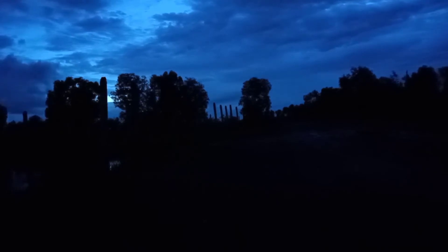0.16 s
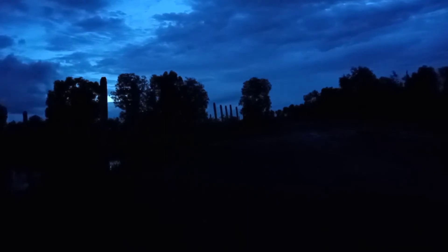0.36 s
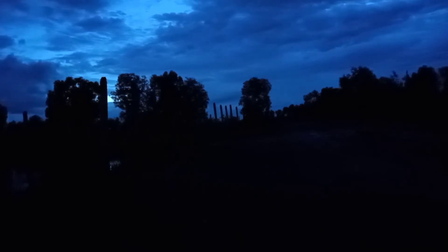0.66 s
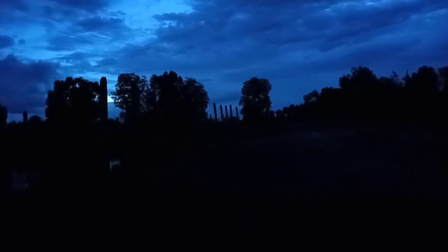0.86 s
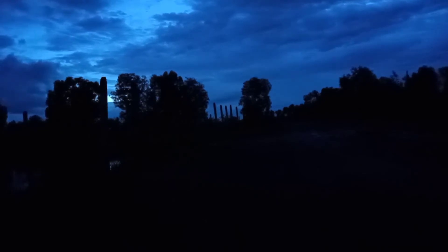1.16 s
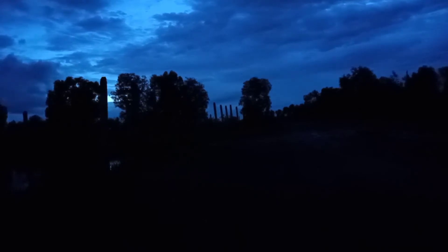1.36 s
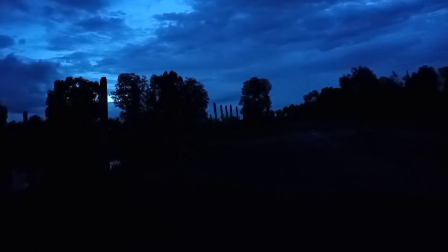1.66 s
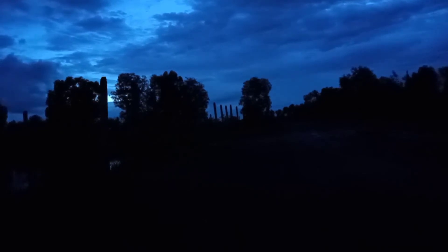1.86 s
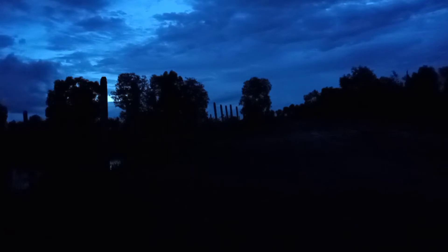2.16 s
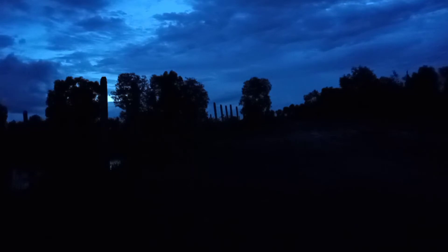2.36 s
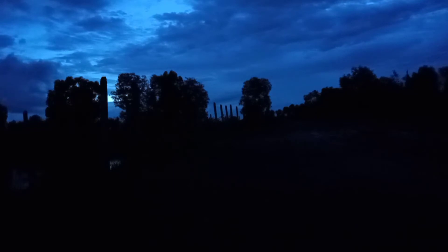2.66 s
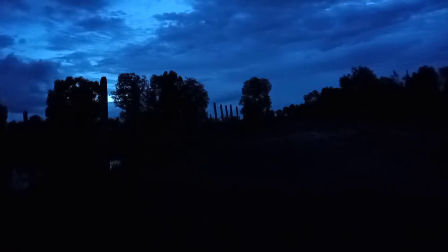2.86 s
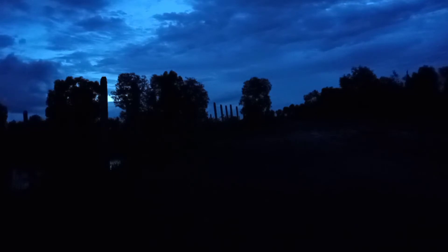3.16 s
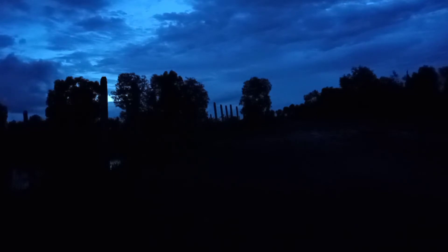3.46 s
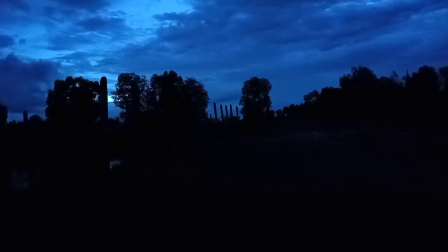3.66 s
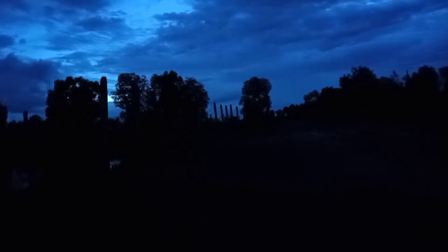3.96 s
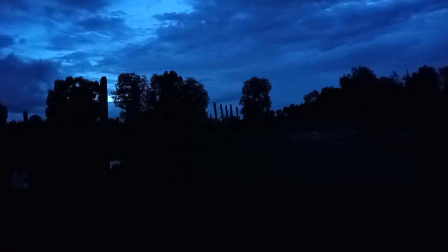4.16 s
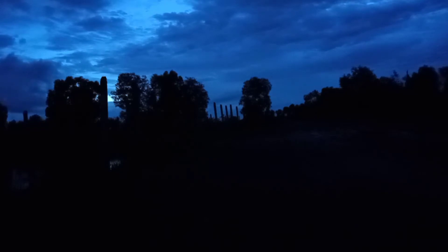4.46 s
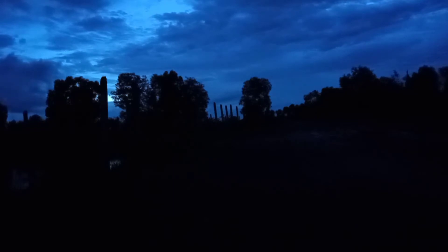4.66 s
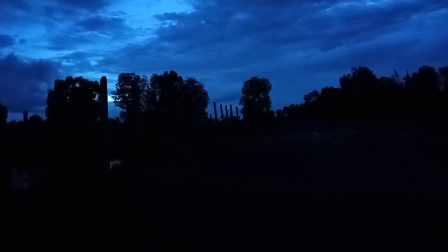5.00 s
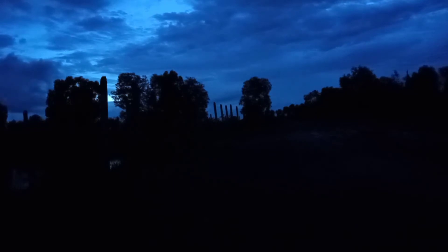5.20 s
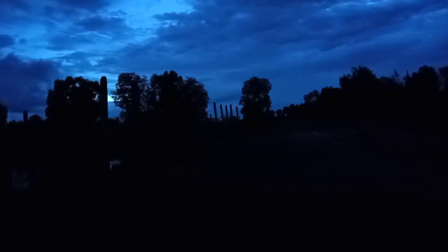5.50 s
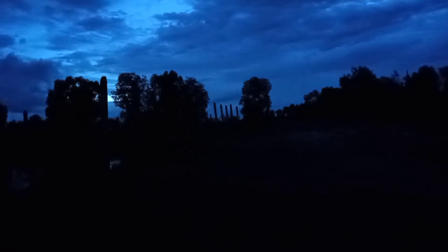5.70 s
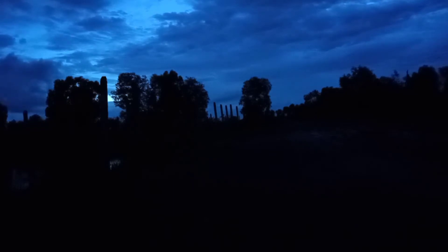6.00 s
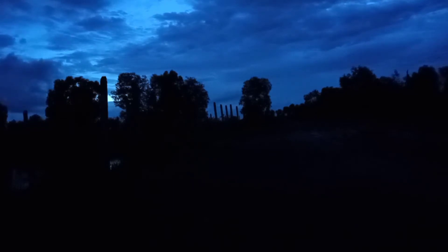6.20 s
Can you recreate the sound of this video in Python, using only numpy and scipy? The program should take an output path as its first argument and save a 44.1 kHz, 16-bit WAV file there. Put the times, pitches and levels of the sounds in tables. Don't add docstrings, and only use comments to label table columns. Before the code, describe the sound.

Open flooded fields at dusk, heard from one still microphone. A close tree frog gives hard, bright, buzzy calls, each about 0.06 s of rapid pulses, at 0.2, 0.5, 0.8 and 1.1 s. A lower far frog answers between them until about 2.1 s. A toad holds a soft swelling hoot at 0.7 s, then gives short falling hoots every half second or so, fainter later. From 1.3 s a second frog croaks hoarsely, then calls clearly until 2.9 s. From 3 to 4.9 s a rough, stumbling frog takes over. A choked near burst at 4.47 s leads to the close frog's loud return from 4.8 s, calling every 0.3 s to the end at 6.3 s, overlapped by others. Underneath: blurred distant chorus, peeps, thin high cricket trill pausing around 3.4-5.3 s, faint insect hiss, slight rustles, low traffic hum, short echoes.

```python
import sys
import numpy as np
from scipy import signal
from scipy.fft import rfft, irfft, next_fast_len
from scipy.io import wavfile
from scipy.ndimage import uniform_filter1d, map_coordinates

SR = 44100
rng = np.random.default_rng(int(sys.argv[2]) if len(sys.argv) > 2 else 0)


def unload_audio(sound):
    columns = np.transpose(np.atleast_2d(sound))
    steps = np.round(np.clip(columns, -1, 1) * 32767)
    wavfile.write(sys.argv[1], SR, steps.astype(np.int16))


def magnitude_from_level(level_db):
    exponent = np.asarray(level_db, float) / 20
    return 10 ** exponent


N = 279594
TIME = np.arange(N) / SR

CLEAR, HOARSE, SHAKY = 0.006, 0.045, 0.12


def unit(x):
    return x / np.sqrt(np.mean(x ** 2) + 1e-20)


def along(points, hz):
    f, v = np.transpose(points)
    return np.interp(np.log(hz + 1), np.log(f + 1), v)


def curves(rows):
    s, *cols = np.transpose(rows)
    return [np.interp(TIME, s, c) for c in cols]


def wobble(rate):
    return map_coordinates(rng.standard_normal(int(N * rate / SR) + 4), [TIME * rate])


def noise(spectrum):
    size = next_fast_len(N)
    colour = magnitude_from_level(along(spectrum, np.fft.rfftfreq(size, 1 / SR)))
    return unit(irfft(rfft(rng.standard_normal(size)) * colour, size)[:N])


def ringing(spectrum, size=4096):
    cepstrum = irfft(np.log(magnitude_from_level(along(spectrum, np.fft.rfftfreq(size, 1 / SR))) + 1e-6))
    cepstrum[1:size // 2] *= 2
    cepstrum[size // 2 + 1:] = 0
    h = irfft(np.exp(rfft(cepstrum)))[:size // 2]
    return h / np.linalg.norm(h)


def glide(s, hz, db, edge, drop):
    out = np.zeros(N)
    start = int(s[0] * SR)
    t = TIME[start:int(s[-1] * SR)]
    settle = 1 + drop * np.exp(-np.abs(t - s[0]) / 0.006)
    phase = 2 * np.pi * np.cumsum(np.interp(t, s, hz) * settle) / SR
    gate = np.clip(np.minimum(t - s[0], s[-1] - t) / edge, 0, 1)
    level = np.sqrt(2) * magnitude_from_level(np.interp(t, s, db))
    out[start:][:len(t)] = level * np.sin(gate * np.pi / 2) ** 2 * np.sin(phase)
    return out


def echo(x, delay=0.013):
    # (frequency [Hz], time to fall 60 dB [s])
    banks = [(300, 0.38), (2000, 0.17), (3500, 0.21), (8000, 0.12)]
    hz, t, z = signal.stft(rng.standard_normal(SR * 3 // 4), SR, nperseg=256)
    dying = magnitude_from_level(-60 * t / along(banks, hz)[:, None])
    tail = signal.istft(z * dying, SR, nperseg=256)[1]
    delayed = np.pad(x, (int(delay * SR), 0))
    return signal.fftconvolve(delayed, tail / np.linalg.norm(tail))[:N]


def reeds(x, db, t60=0.032, size=4096):
    out = np.pad(x, (0, 2 * size))
    t = np.arange(size // 2) / SR
    for a in range(0, N, size // 2):
        paths = rng.standard_normal(len(t)) * magnitude_from_level(-60 * t / t60)
        piece = x[a:a + size] * np.hanning(size)[:N - a]
        if np.abs(piece).max() > 1e-7:
            scattered = signal.fftconvolve(piece, paths / np.linalg.norm(paths))
            out[a:][:len(scattered)] += magnitude_from_level(db) * scattered
    return out[:N] / np.sqrt(1 + magnitude_from_level(2 * db))


def add_pulses(out, call, jitter, scatter_db):
    steady_s = 0.024
    ragged, ragged_s = 0.2, 0.013
    s, rate, db = np.transpose(call)
    t = np.arange(s[0], s[-1], 1 / SR)
    cycles = np.cumsum(np.interp(t, s, rate)) / SR
    chance = rng.standard_normal((2, 60))[:, :int(cycles[-1]) + 1]
    beat = np.arange(chance.shape[1])
    due = np.interp(beat, cycles, t)
    stumble = ragged * np.clip(1 - (s[-1] - due) / ragged_s, 0, 1)
    scatter = np.interp(due - s[0], [0, steady_s], [np.max(jitter), np.min(jitter)])
    when = np.interp(beat + np.abs((scatter + stumble) * chance[0]), cycles, t)
    size = magnitude_from_level(np.interp(when, s, db) + scatter_db * chance[1]) * np.sqrt(SR / np.interp(when, s, rate))
    at = np.floor(when * SR).astype(int)[:, None] + np.arange(-8, 9)
    off = at - when[:, None] * SR
    np.add.at(out, at, size[:, None] * np.sinc(off) * np.cos(np.pi * off / 18) ** 2)


def voice(calls, sac, jitter, scatter_db, tighten=1):
    pulses, empty = np.zeros(N + SR), np.zeros(N + SR)
    for call in calls:
        add_pulses(pulses, call, jitter, scatter_db)
        a, b = int(call[0][0] * SR) - 9, int(call[-1][0] * SR) + 9
        empty[max(a, 0):b] = np.clip(np.linspace(-0.3, 1.6, b - max(a, 0)), 0, 1)
    if tighten == 1:
        return signal.fftconvolve(pulses, ringing(sac))[:N]
    tight_sac = [(tighten * hz, db) for hz, db in sac]
    full = signal.fftconvolve(pulses * (1 - empty), ringing(sac))
    emptied = signal.fftconvolve(pulses * empty, ringing(tight_sac))
    return (full + emptied)[:N]


def far_frog(rows, sac, jitter, scatter_db, start_db, end_db, rally, settle=0.5):
    calls = [[(s, first, db + start_db),
              (s + settle * long, mid, db),
              (s + 0.89 * long, mid * (1 + 2 * rally) / 3, db),
              (s + long, rally * mid, db + end_db)]
             for s, long, db, first, mid in rows]
    return voice(calls, sac, jitter, scatter_db)


def traffic():
    # (time [s], level [dB])
    swell = [(0, -45.5), (1.8, -45.5), (2.7, -46), (3.7, -45), (4.3, -48), (5.5, -46), (6.34, -46)]
    # (frequency [Hz], level [dB])
    hum = [(13, -32), (22, -36), (72, 2), (103, 4), (136, 1.5), (204, -9), (285, -10.5), (398, -17.5),
           (537, -17.5), (1200, -27), (1560, -74), (2640, -120)]
    level_db = curves(swell)[0] + 1.5 * wobble(3.5) + 1.8 * wobble(12)
    return magnitude_from_level(level_db) * noise(hum)


def crickets():
    # (start [s], end [s], swell [s], level [dB])
    bouts = [
        (0, 0.376, 0.018, -61),
        (.48, 3.37, 0.06, -62),
        (5.351, 6.5, .4, -64),
    ]
    # (time [s], rate [strokes/s])
    strokes = [(0, 43.1), (1.6, 43.4), (2.5, 42.8), (3.3, 42), (5.4, 44.4), (6.34, 44.2)]
    # (frequency [Hz], level [dB])
    wing_colour = [(7900, -40), (8500, -12), (8700, 0), (9050, -1), (9250, -10), (9550, -14), (9900, -40)]
    # (frequency [Hz], level [dB])
    hiss = [(3500, -44.5), (4500, -31.5), (5300, -14.5), (6200, -21.5), (6800, -16.5), (7200, -2),
            (7650, -11.5), (8400, 1), (9400, -18.5), (9900, -21.5), (11000, -17.5), (12500, -32.5),
            (15000, -22), (15600, -37)]
    silent_db, shy_db, stop_s = -79.5, -13.5, 0.03
    close_db = np.max([np.interp(TIME, [a - stop_s, a, a + swell, b - stop_s, b],
                                 [silent_db, db + shy_db, db, db, silent_db])
                       for a, b, swell, db in bouts], axis=0)
    rate = curves(strokes)[0]
    into = (np.cumsum(rate) / SR + 0.3) % 1 / rate
    scrapes = 0
    for delay, db in [(0.0045, 0), (0.0113, -0.5), (0.0145, -12), (0.018, -11)]:
        u = np.clip(into - delay, 0, 1) / 0.0009
        scrapes = scrapes + magnitude_from_level(db) * u * np.exp(1 - u)
    wing = np.sin(2 * np.pi * np.cumsum(8850 + 90 * wobble(500)) / SR)
    close = unit(scrapes * magnitude_from_level(2 * wobble(90)) * wing) + 0.38 * noise(wing_colour)
    return magnitude_from_level(close_db - 2.5) * close + magnitude_from_level(-70 + 1.3 * wobble(5)) * noise(hiss)


def chorus(count=150):
    # (time [s], level [dB])
    swell = [(0, -47.5), (.26, -53), (.75, -54), (.94, -52), (1.3, -53), (2.7, -56.5), (2.9, -49),
             (3.0, -54.5), (4.1, -55.5), (4.31, -49), (4.43, -56.5), (4.56, -47.5), (4.7, -49.5),
             (5.55, -50), (5.7, -44), (5.86, -58), (6.1, -39), (6.34, -55.5)]
    # (frequency [Hz], level [dB])
    sac = [(700, -33), (1100, -28), (1520, -8.5), (2150, -13), (2600, -12.5), (3170, -2), (3450, 0.5),
           (3900, -9.5), (4660, -21.5), (6000, -37), (9000, -63.5)]
    blur = 1.8
    gap = N / SR / count
    rows = []
    for i, (late, loud, quick) in enumerate(rng.random((count, 3))):
        hz = 330 + 110 * quick
        rows.append((0.01 + gap * (i + late), 0.07, 7 * loud, 1.2 * hz, hz))
    direct = far_frog(rows, sac, jitter=HOARSE, scatter_db=2, start_db=-6, end_db=-9, rally=1.2)
    blurred = unit(direct) + blur * np.roll(unit(echo(direct)), SR)
    steady = blurred / np.sqrt(uniform_filter1d(blurred ** 2, SR // 5) + 1e-9)
    return magnitude_from_level(curves(swell)[0]) * steady


def peeps():
    # (time [s], length [s], level [dB], first pitch [Hz], last pitch [Hz])
    rows = [(6.0825, .0145, -40.5, 1390, 1230), (0.015, 0.02, -43.5, 2350, 2000),
            (1.1, 0.021, -49, 2250, 1960), (1.382, 0.02, -37.5, 1560, 2040), (1.2, .015, -43, 3150, 3600),
            (1.394, .008, -50, 3900, 4200), (3.064, 0.0203, -41.5, 1350, 1900),
            (3.1, 0.077, -59, 1750, 1650), (3.632, .05, -60, 1680, 1800), (5.06, .018, -44, 2000, 1900),
            (3.378, 0.01, -36, 910, 740), (4.084, 0.012, -33, 910, 880), (5.057, 0.021, -34.5, 953, 820),
            (0.033, 0.044, -48.5, 288, 331), (0.061, 0.032, -48.5, 560, 470),
            (0.052, 0.045, -48.5, 880, 918), (0.21, 0.06, -52, 290, 314), (0.19, 0.09, -57.5, 594, 610),
            (0.21, 0.06, -58.5, 875, 938), (4.474, 0.012, -28.5, 1890, 2170),
            (4.678, 0.016, -39.5, 2300, 1900), (6.086, 0.031, -40, 900, 830),
            (4.487, 0.024, -47, 1600, 1400), (5.0525, 0.0135, -41.5, 1185, 1075),
            (5.661, 0.38, -63.5, 511, 521)]
    tones = sum(glide([s, s + long], [first, last], [db, db], edge=min(long / 2, 0.004), drop=0)
                for s, long, db, first, last in rows)
    tones = tones * magnitude_from_level(3 * wobble(60))
    return tones + magnitude_from_level(-12.5) * echo(tones)


def fourth_frog():
    # (time [s], length [s], level [dB], first pulse rate [Hz], middle pulse rate [Hz])
    rows = [
        (.046, 0.078, -38, 320, 336),
        (.345, .078, -45, 306.6, 337.2),
        (.632, 0.054, -44.5, 329, 339.4),
        (.925, 0.055, -41, 350.5, 334.7),
        (1.21, .07, -43.5, 349, 332.8),
        (1.492, 0.063, -44.5, 341, 323.2),
        (1.774, 0.054, -47, 321, 333.3),
        (2.06, 0.078, -46.5, 359.4, 329.4),
    ]
    # (frequency [Hz], level [dB])
    sac = [(800, -36.5), (1350, -15.5), (1700, -5), (2100, -3), (2600, -12.5), (3000, -10.5), (3350, 5.5),
           (3700, -5), (4100, -31.5), (4600, -33.5), (5500, -43), (6750, -52), (7200, -33), (7600, -50),
           (9000, -58)]
    calls = far_frog(rows, sac, (SHAKY, CLEAR), scatter_db=2, start_db=-1, end_db=-10, rally=1, settle=0.35)
    return reeds(calls, db=-6)


def grass():
    # (time [s], length [s], level [dB], low edge [Hz], high edge [Hz])
    rustles = [(.879, .004, -67, 10500, 15600), (2.048, 0.032, -57.5, 6200, 8400),
               (2.052, 0.026, -76, 8200, 12000), (4.32, 0.038, -71, 9550, 21000),
               (4.62, 0.084, -74, 7900, 12000), (4.63, .09, -74, 9700, 12200),
               (4.62, .1, -84, 14400, 15500), (4.74, .04, -77, 10800, 11800),
               (4.49, 0.12, -79.5, 10500, 11500), (1.8, .012, -77, 7000, 12000),
               (3.057, .03, -68.5, 6500, 9900), (.42, 0.22, -69, 5300, 8350), (.33, .06, -82, 10700, 11100),
               (6.12, .09, -77, 10400, 11500), (4.95, .12, -76, 10400, 11500),
               (5.77, .09, -79, 10300, 11500), (2.055, .012, -62, 4500, 6100),
               (4.63, .09, -81, 12200, 14400), (.054, .033, -50, 380, 900)]
    out = np.zeros(N)
    for s, long, db, lo, hi in rustles:
        swell = np.sin(np.pi * np.clip((TIME - s) / long, 0, 1))
        band = noise([(0.95 * lo, -40), (lo, 0), (hi, 0), (1.03 * hi, -40)])
        out += magnitude_from_level(db) * np.sqrt(np.clip(swell, 0, 1)) * band * magnitude_from_level(4 * wobble(150))
    return out


def near_frog():
    # (time [s], length [s], level [dB])
    rows = [
        (.199, 0.059, -15.5),
        (0.4914, 0.061, -15.5),
        (0.7812, 0.058, -15),
        (1.097, 0.058, -15.5),
        (4.779, 0.052, -14.5),
        (5.126, .06, -15),
        (5.4266, 0.0617, -15.5),
        (5.759, 0.06, -15.5),
        (6.058, 0.057, -16),
        (6.307, 0.05, -16),
    ]
    # (time [s], rate [Hz])
    rates = [
        [(0.199, 471), (0.209, 449), (0.22, 450), (0.231, 415), (0.241, 421.4), (0.251, 463), (0.257, 473)],
        [(0.491, 468.5), (0.525, 428), (0.533, 435.7), (0.543, 450), (0.548, 476)],
        [(0.782, 472), (0.796, 451), (0.814, 435.5), (0.821, 445), (0.832, 478), (0.837, 470)],
        [(1.097, 464.6), (1.117, 441.5), (1.154, 453)],
        [(4.778, 482), (4.802, 398.4), (4.814, 420.4), (4.826, 475), (4.831, 476)],
        [(5.126, 464), (5.132, 451), (5.142, 445.6), (5.152, 404.7), (5.168, 421), (5.18, 451), (5.184, 477)],
        [(5.426, 471.4), (5.452, 395.7), (5.458, 408), (5.474, 419), (5.482, 464), (5.486, 476)],
        [(5.759, 468.6), (5.787, 409.3), (5.797, 404), (5.807, 465), (5.817, 458)],
        [(6.058, 474.6), (6.084, 403.4), (6.093, 416), (6.104, 457), (6.112, 447)],
        [(6.307, 455.5), (6.315, 447.5), (6.327, 398), (6.338, 411.4)],
    ]
    # (time [s], pulse rate [Hz], level [dB])
    choked = [
        (4.465, 501, -15.5),
        (4.474, 511, -13),
        (4.478, 514, -23),
        (4.479, 515, -24),
    ]
    # (frequency [Hz], level [dB])
    sac = [(800, -55.5), (1300, -37), (1700, -19.5), (2100, -16), (2900, -12), (3300, -6), (3480, 2.5),
           (3610, 3.5), (3760, 0), (3880, -17), (4050, -18), (4400, -25.5), (5200, -41), (6400, -53),
           (6800, -65), (8000, -88)]
    # (frequency [Hz], level [dB])
    overtones = [(6700, -45), (7050, -4), (7280, 2), (7600, -9), (8200, -12), (9100, -26), (10300, -17),
                 (11200, -24), (12300, -36), (13800, -25), (14700, -8), (15200, -7), (15650, -19),
                 (15800, -60)]
    even = 0.009
    calls = [np.array(choked)]
    for (s, long, db), rate in zip(rows, rates):
        at = s + np.linspace(0, long, num=16)
        effort = np.interp(at - s, [0, long / 8, long - 0.008, long], [1.5, 0, -0.3, -13])
        calls.append(np.transpose([at, np.interp(at, *np.transpose(rate)), db + effort]))
    body = voice(calls, sac, jitter=even, scatter_db=0.55, tighten=1.0124)
    upper = voice(calls, overtones, jitter=even, scatter_db=1.5, tighten=0.975)
    return reeds(body + magnitude_from_level(-43) * upper, db=-16, t60=0.012)


def hoot(s, long, hz, db, over_db, drop=0.27):
    settle_s, dying_s = 0.0083, 0.025
    at = np.array([0, min(settle_s, long / 3), long - min(dying_s, long / 2), long])
    pitch = hz * np.array([1.074, 1, 0.949, 0.68])
    tone = glide(s + at, pitch, db + np.array([15, 0, 2.5, -7]), edge=0.0052, drop=drop)
    fading_db = over_db - 349 * at
    return tone + glide(s + at, 2 * np.minimum(pitch, hz), fading_db, edge=0.0015, drop=0.08)


def toad():
    # (time [s], length [s], early pitch [Hz], late pitch [Hz], level [dB])
    held_row = (.722, .15, 430, 450, -42)
    # (time [s], length [s], pitch [Hz], level [dB], overtone level [dB])
    resumed = (.872, .055, 432, -43, -70)
    # (time [s], length [s], pitch [Hz], level [dB], overtone level at the start [dB])
    rows = [
        (1.237, 0.074, 447, -41, -58),
        (1.729, 0.07, 446, -41.5, -58),
        (2.184, 0.072, 451.5, -41, -54.5),
        (2.72, 0.065, 457, -42, -54.5),
        (3.38, 0.064, 421, -44, -49),
        (3.681, 0.026, 437, -50, -56),
        (4.086, 0.053, 438, -46.5, -39),
        (5.053, 0.057, 431, -49.5, -40.5),
        (5.44, 0.031, 500, -52.5, -62.5),
        (6.085, 0.06, 438, -51.5, -44.5),
    ]
    s, long, early, late, db = held_row
    held = glide([s, s + 2 * 0.0083, s + 0.83 * long, s + 0.92 * long, s + long],
                 [1.074 * early, early, late, 1.08 * late, 1.2 * late],
                 [db, db, db, db + 8, db - 1], edge=0.004, drop=0.27)
    hoots = held + hoot(*resumed, drop=0.02) + sum(hoot(*row) for row in rows)
    return hoots + magnitude_from_level(-11) * echo(hoots)


def second_frog():
    # (time [s], length [s], level [dB], first pulse rate [Hz], middle pulse rate [Hz])
    croaks = [
        (1.327, .012, -42, 395, 400),
        (1.337, .04, -36.5, 380, 400),
    ]
    rows = [
        (1.603, 0.058, -34.5, 431.4, 377.8),
        (1.953, 0.06, -34.5, 437.5, 390),
        (2.2545, .065, -34.5, 448, 395.2),
        (2.536, .065, -34, 477, 400.2),
        (2.844, .065, -35.5, 439.4, 406.5),
        (4.747, 0.053, -31.5, 377, 386),
        (4.981, 0.056, -33.5, 428, 390),
        (5.408, 0.082, -32.5, 443, 390.3),
        (6.13, .074, -36.5, 390, 400),
    ]
    # (frequency [Hz], level [dB])
    sac = [(800, -75), (1350, -27), (1700, -10.5), (2100, -9), (2600, -9), (3000, -3), (3300, 3),
           (3650, -4), (4100, -19), (4600, -29), (5500, -37), (6500, -46), (11000, -81)]
    clear = far_frog(rows, sac, (SHAKY / 2, CLEAR), scatter_db=2, start_db=-0.5, end_db=-13, rally=1.05)
    croaked = far_frog(croaks, sac, 2 * HOARSE, scatter_db=3, start_db=-2, end_db=-8, rally=1.05)
    return reeds(clear + croaked, db=-6)


def distant_frogs():
    # (time [s], length [s], level [dB], first pulse rate [Hz], middle pulse rate [Hz])
    rows = [(2.335, 0.08, -52, 430, 402), (2.47, 0.025, -58.5, 392, 380), (2.62, .06, -51, 414, 391),
            (2.785, .06, -49.5, 407, 412), (3.245, 0.065, -55, 427, 388), (3.47, 0.056, -51.5, 423, 389),
            (3.79, 0.027, -52, 421, 377), (3.875, 0.088, -52.5, 407, 381),
            (4.487, 0.035, -45.5, 416, 398.5), (4.552, 0.027, -36.5, 414.5, 375),
            (4.571, 0.02, -32, 403.4, 395.4), (4.6, .04, -45, 410, 387.5), (4.69, 0.027, -57, 404, 386),
            (5.82, 0.043, -39, 438, 394), (6.2, 0.063, -63, 398, 394)]
    # (frequency [Hz], level [dB])
    sac = [(800, -52.5), (1350, -21), (1700, -10.5), (2100, -9.5), (2600, -15), (3000, -6), (3450, 0),
           (3900, -10.5), (4500, -24), (5500, -32.5), (9000, -64.5)]
    calls = far_frog(rows, sac, HOARSE, scatter_db=1.5, start_db=-3, end_db=-8, rally=1.05)
    return reeds(calls, db=3)


def hoarse_frog():
    # (time [s], length [s], level [dB], first pulse rate [Hz], middle pulse rate [Hz])
    rows = [
        (3.055, 0.036, -45, 445, 415),
        (3.377, 0.074, -39.5, 473, 399.3),
        (3.692, 0.072, -38.5, 463, 392),
        (3.949, 0.087, -39.5, 465, 393.3),
        (4.188, 0.024, -38, 440, 325.6),
        (4.271, 0.064, -39, 445, 372.7),
        (4.645, 0.015, -41, 458, 406),
        (4.672, 0.023, -44, 415, 357),
        (4.875, 0.028, -38, 444, 381.6),
    ]
    # (frequency [Hz], level [dB])
    sac = [(800, -52), (1350, -12), (1700, -.4), (2100, -1.5), (2700, -11), (3300, -1.5), (3900, 1),
           (4200, -3.5), (4700, -23), (5500, -30), (6500, -36.5), (7500, -27), (10200, -47), (11000, -42.5),
           (11800, -53), (13000, -58)]
    rally = 1.04
    calls = [[(s, first, db + 4),
              (s + 0.3 * long, 0.85 * mid, db - 3),
              (s + 0.6 * long, mid, db),
              (s + 0.9 * long, rally * mid, db - 1),
              (s + long, rally * mid, db - 11)]
             for s, long, db, first, mid in rows]
    return reeds(voice(calls, sac, HOARSE, scatter_db=2, tighten=0.96), db=-6)


def fifth_frog():
    # (time [s], length [s], level [dB], first pulse rate [Hz], middle pulse rate [Hz])
    rows = [
        (4.952, 0.059, -35.5, 341, 366),
        (5.02, 0.047, -41.5, 369.4, 362.4),
        (5.228, 0.073, -36.5, 344, 363),
        (5.603, 0.08, -37, 336.4, 371.8),
        (5.956, 0.085, -36.5, 347, 370),
    ]
    # (frequency [Hz], level [dB])
    sac = [(800, -51), (1400, -17), (2100, -10), (2800, -17), (3250, -13), (3600, 1), (4000, -10.5),
           (4600, -27), (5500, -33), (6500, -40), (9800, -58), (11000, -49), (12000, -70)]
    calls = far_frog(rows, sac, (SHAKY, CLEAR), scatter_db=1.8, start_db=0, end_db=-7, rally=0.97, settle=0.35)
    return reeds(calls, db=-5)


def frogs():
    # (frequency [Hz], level [dB])
    sideways = [(1200, -0.7), (1900, 5.5), (3000, -2), (3550, -4.5), (4000, 3.5), (4400, 8.5), (5000, 5.5),
                (6000, 3.5)]
    near = near_frog()
    far = [(fourth_frog(), -5), (second_frog(), -8.5), (distant_frogs(), -10),
           (hoarse_frog(), -10), (fifth_frog(), -4.5)]
    wet = magnitude_from_level(-22.5) * echo(signal.fftconvolve(near, ringing(sideways))[:N])
    wet = wet + sum(magnitude_from_level(echo_db) * echo(calls) for calls, echo_db in far)
    direct = near + magnitude_from_level(1.5) * sum(calls for calls, _ in far)
    return direct + wet * magnitude_from_level(3.5 * wobble(220))


def scene():
    return (traffic() + crickets() + chorus() + peeps() + grass() + toad() + frogs())[None]


def top_cut(x):
    return signal.sosfilt(signal.butter(12, 15760, fs=SR, output="sos"), x)


def record(dry):
    mix = dry * np.clip((N / SR - TIME) / 0.002, 0, 1)
    return top_cut(mix)


dry = scene()
out = record(dry)
unload_audio(out)
```